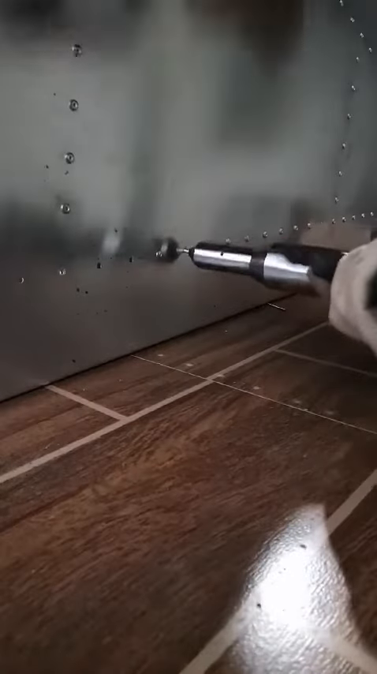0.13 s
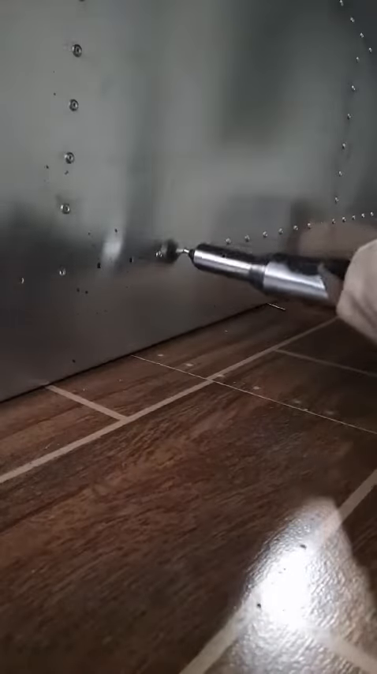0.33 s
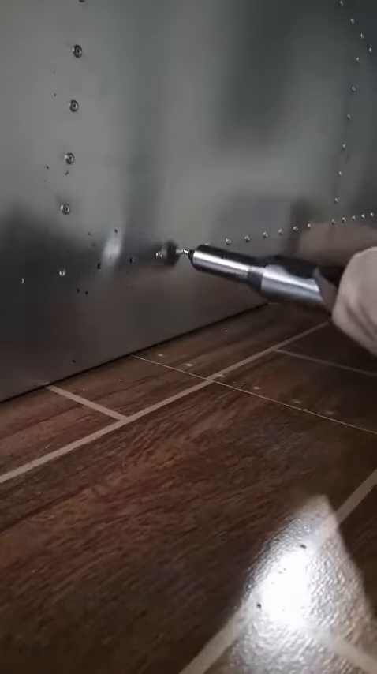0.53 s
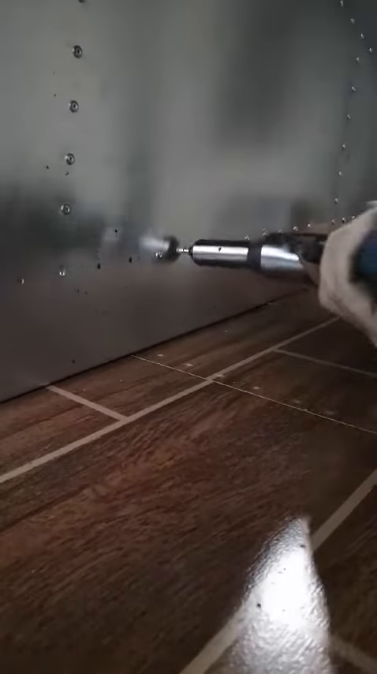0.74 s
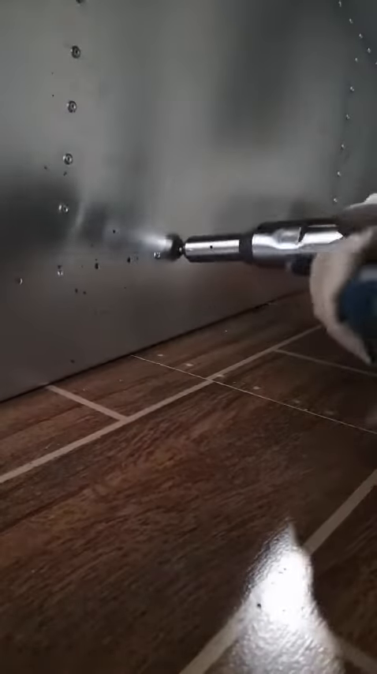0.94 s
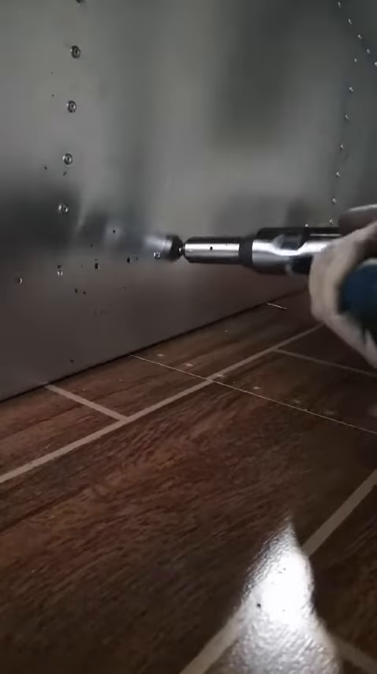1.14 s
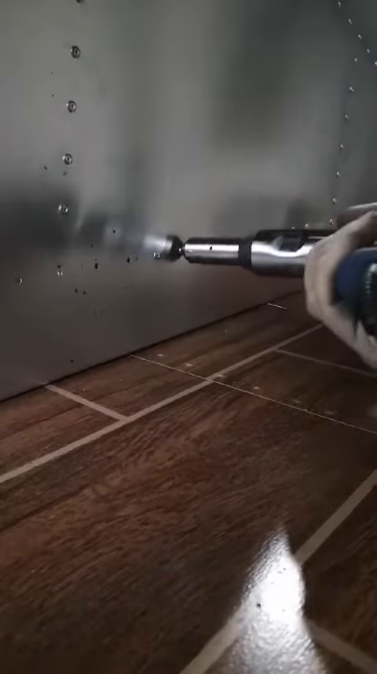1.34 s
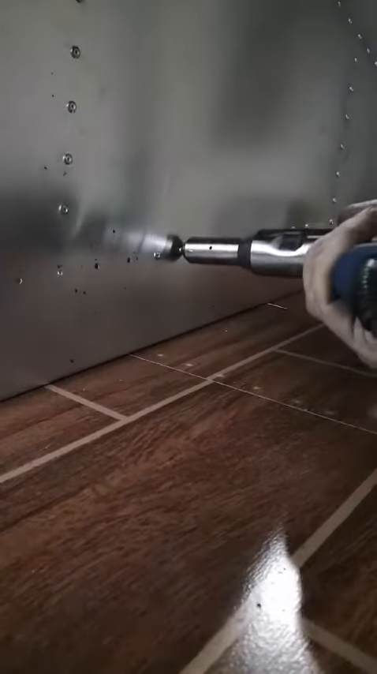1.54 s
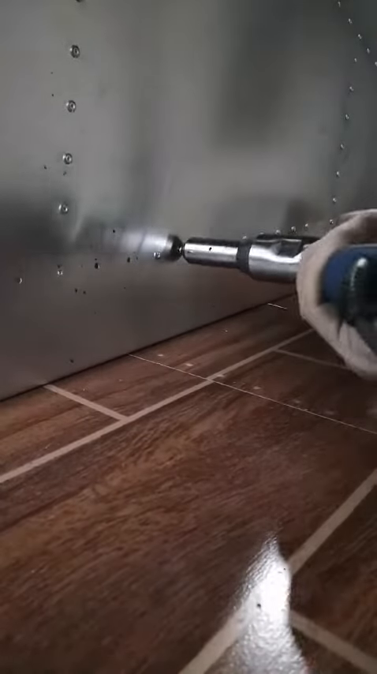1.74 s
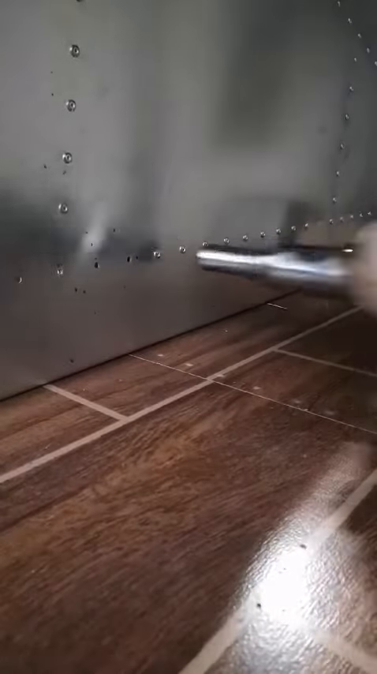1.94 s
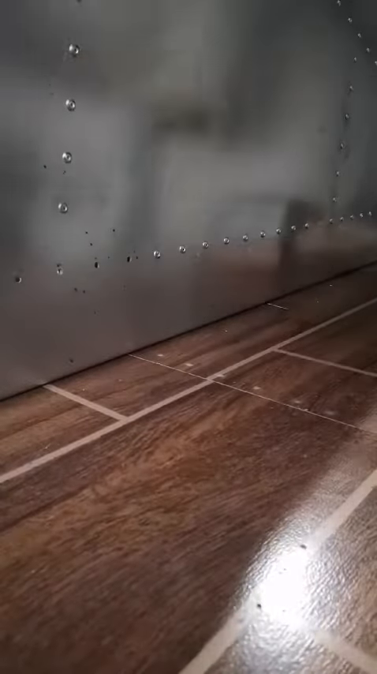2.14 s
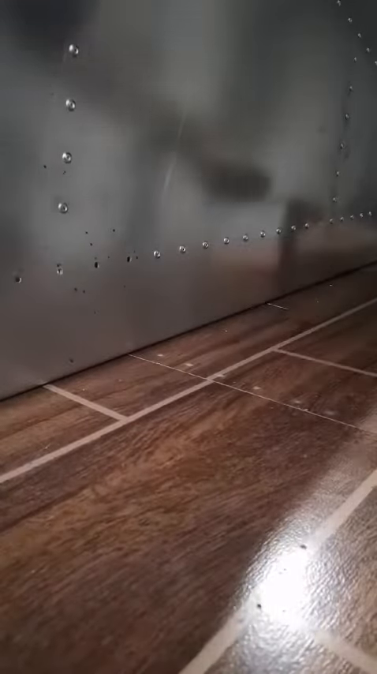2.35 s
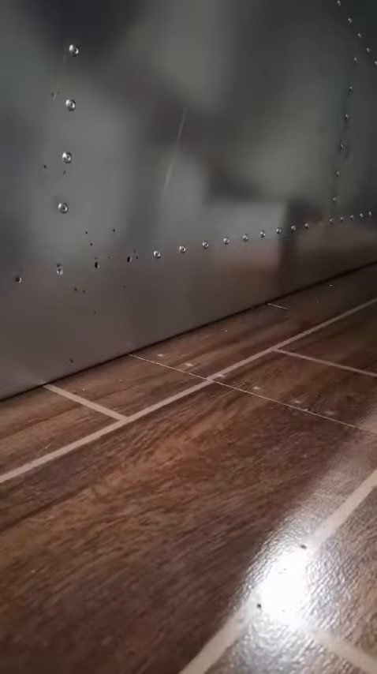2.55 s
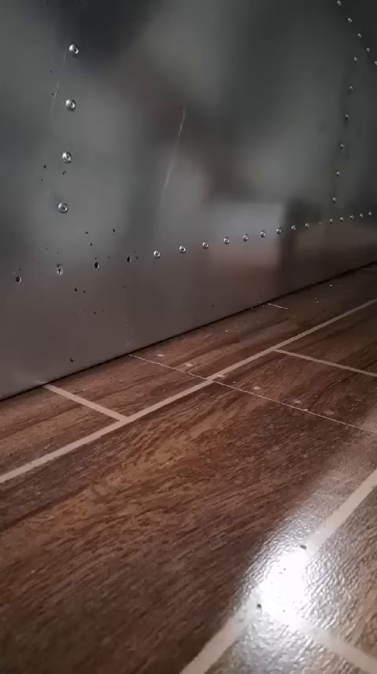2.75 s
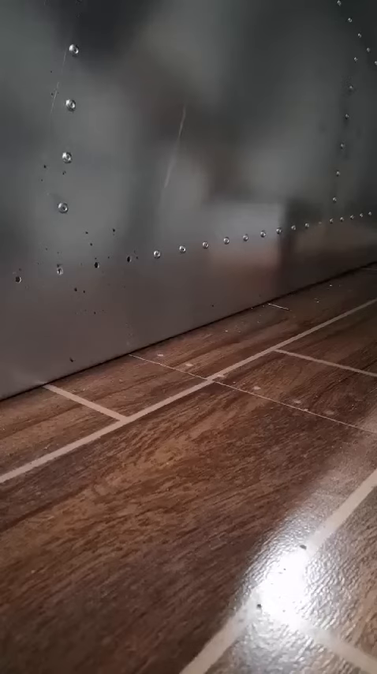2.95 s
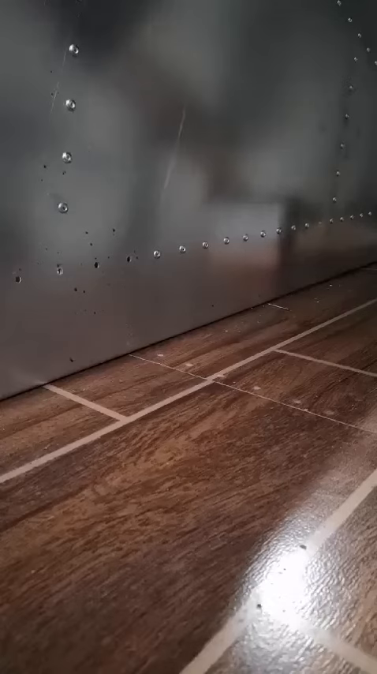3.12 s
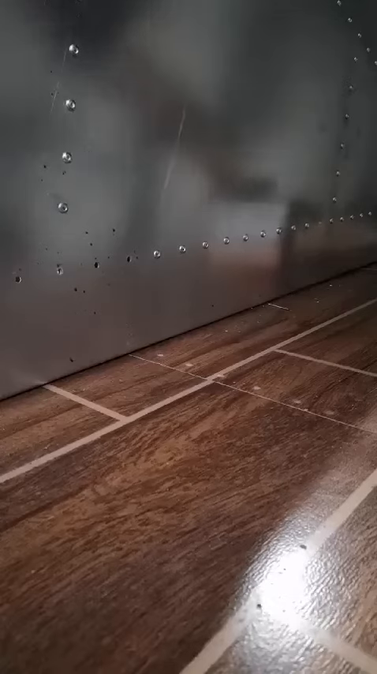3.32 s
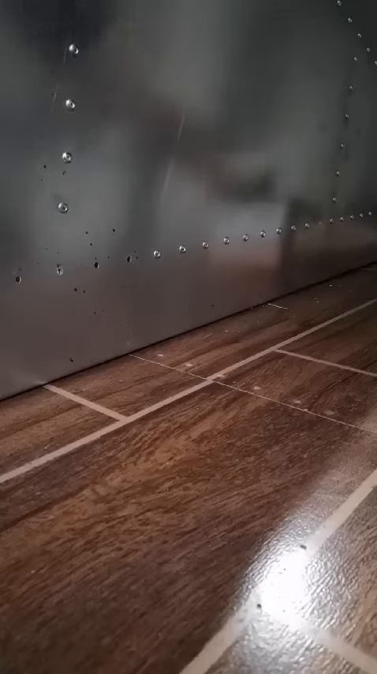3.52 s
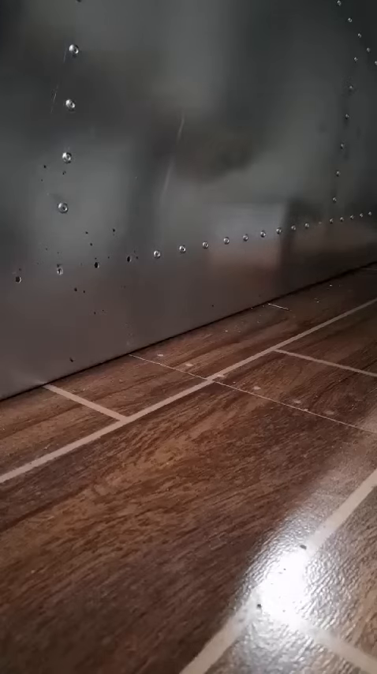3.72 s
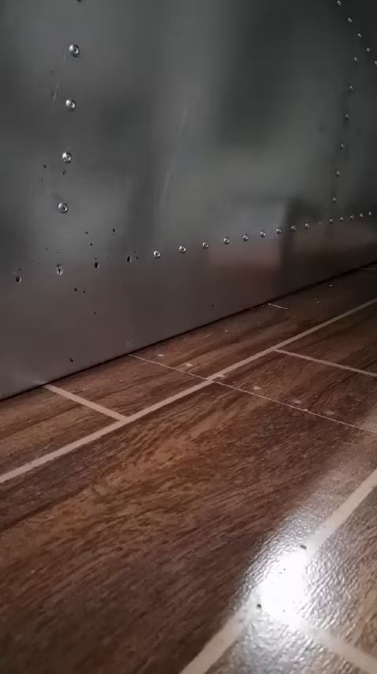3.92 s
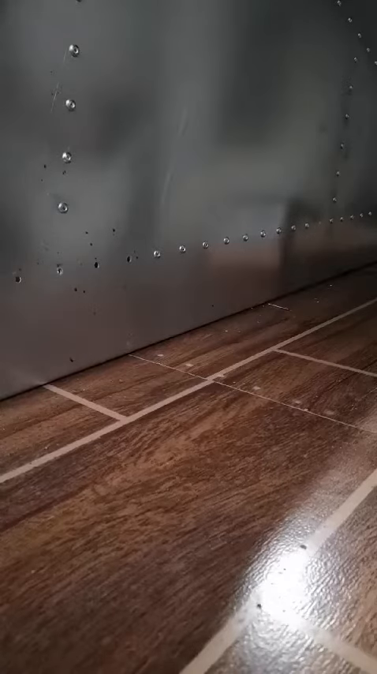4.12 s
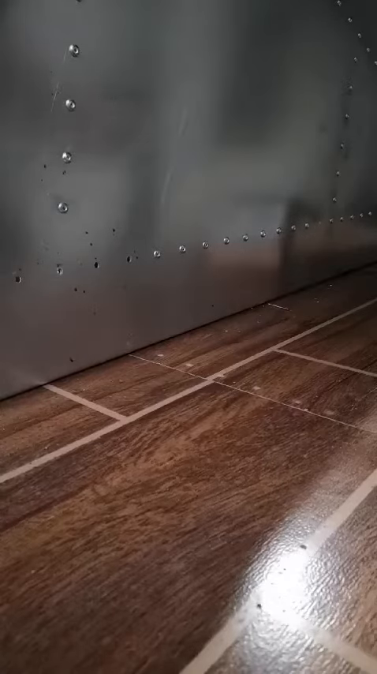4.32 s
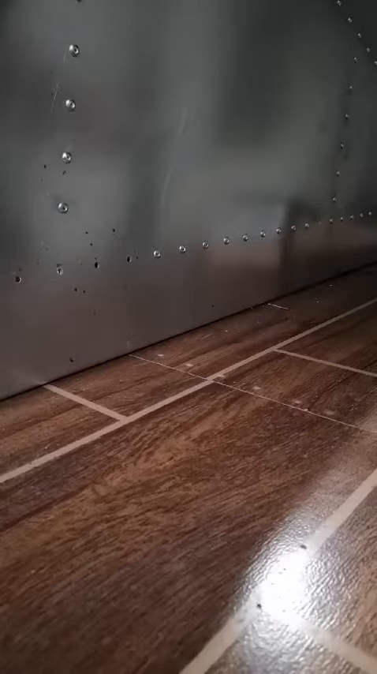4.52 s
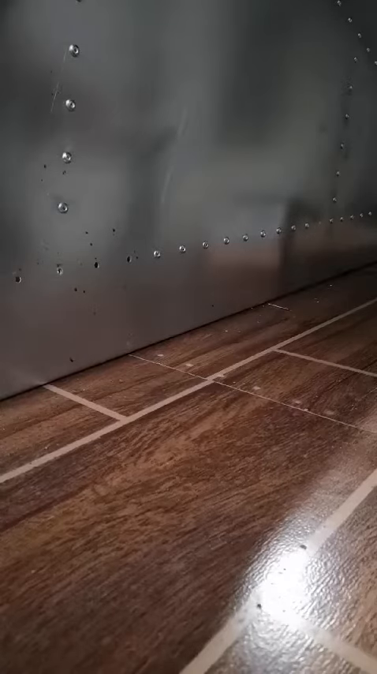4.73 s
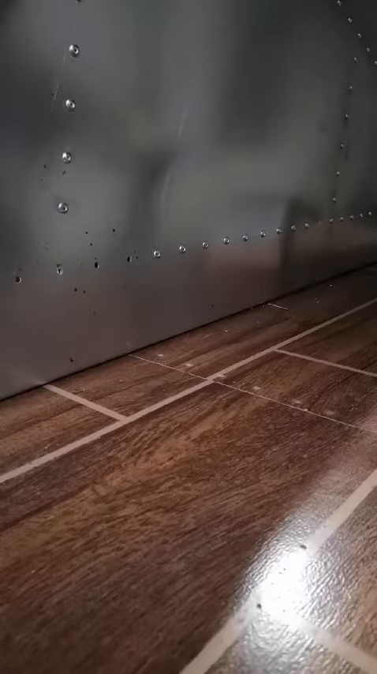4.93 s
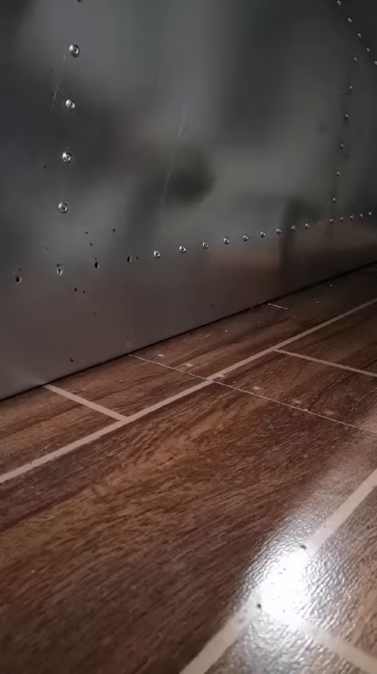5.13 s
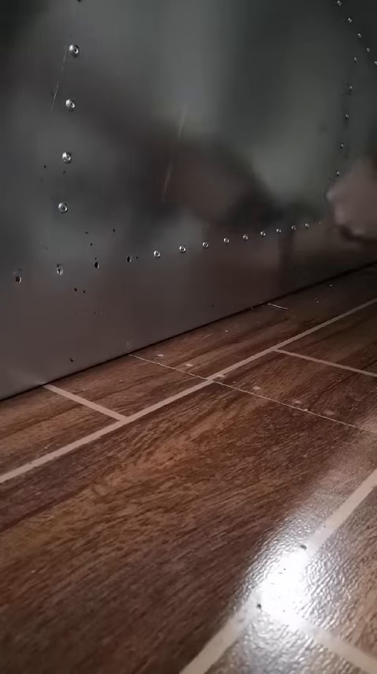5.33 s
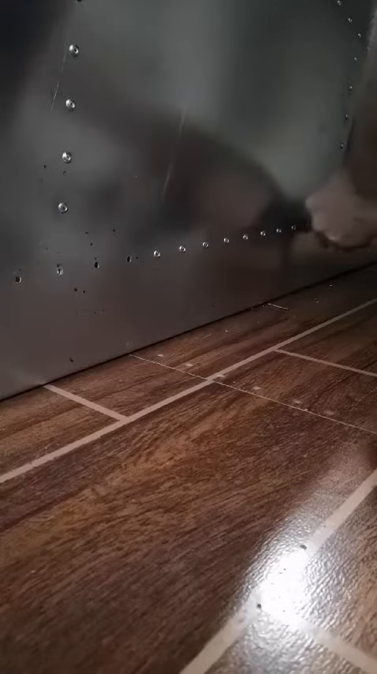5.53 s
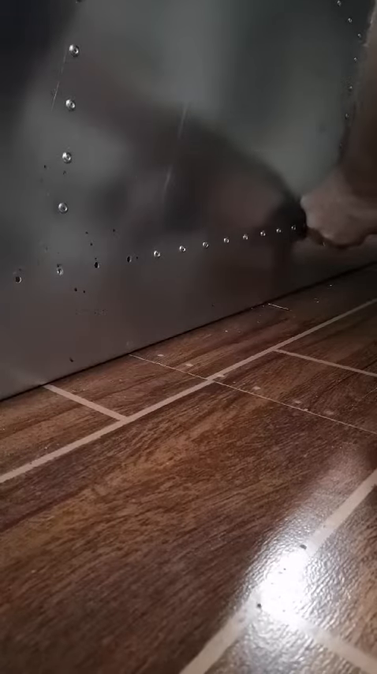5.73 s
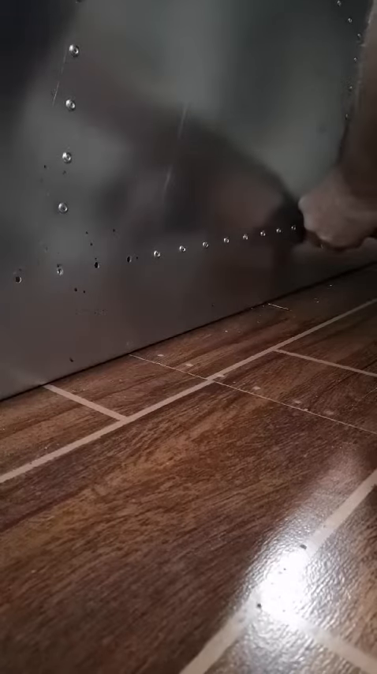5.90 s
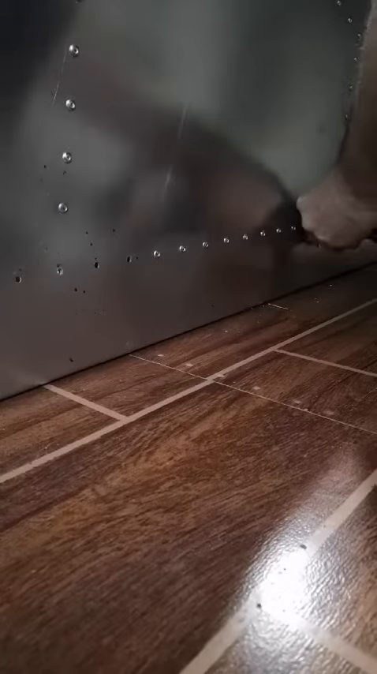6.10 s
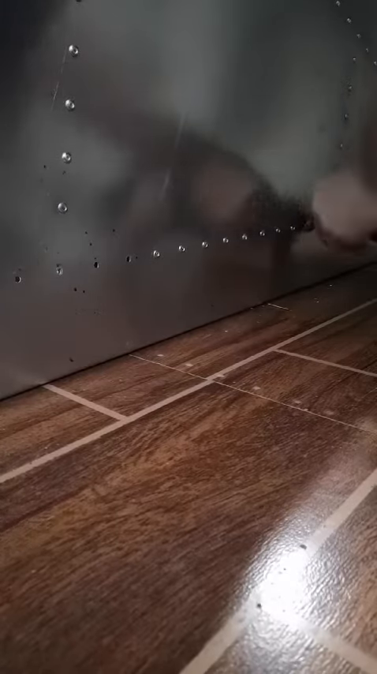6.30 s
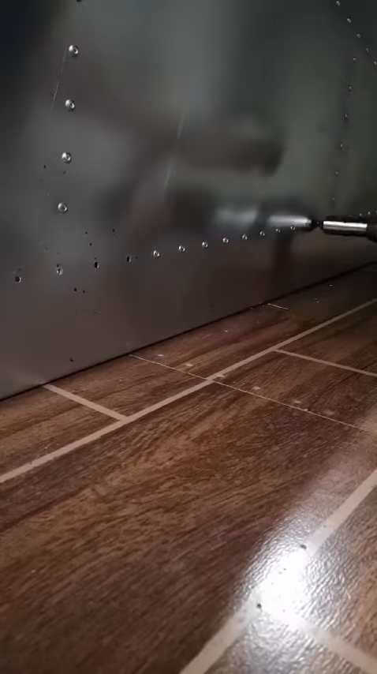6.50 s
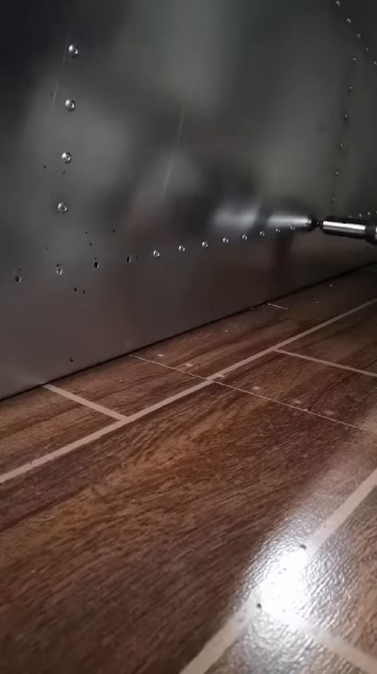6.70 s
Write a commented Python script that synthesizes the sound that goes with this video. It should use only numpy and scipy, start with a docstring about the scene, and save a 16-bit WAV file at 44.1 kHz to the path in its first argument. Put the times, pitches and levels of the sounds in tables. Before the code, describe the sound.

An air drill whines and hisses nonstop against a metal wall, with dull thumps, a brief squealing bite and sharp metallic snaps.

```python
"""An air drill runs without a stop beside a riveted metal wall, drilling out rivets.
Its vane motor whines; its exhaust roars, hisses and sets the muffler ringing. The bit bites with a squeal,
the motor sags, and the bit comes free with a sharp snap. The drill is drawn back, then set on the next
rivet. The sheet booms dully whenever it is bumped, over the faint hum of the room.
The hardest snaps make a limiter duck the whole sound for a moment."""
import sys
import numpy as np
from scipy import signal
from scipy.fft import rfft, irfft, next_fast_len
from scipy.io import wavfile
from scipy.ndimage import uniform_filter1d, minimum_filter1d, map_coordinates

SR = 44100
rng = np.random.default_rng(int(sys.argv[2]) if len(sys.argv) > 2 else 0)


def wrap_up_sound(samples):
    """Save the sound to the file named by the first command line argument, as 16-bit audio."""
    columns = np.atleast_2d(samples).T
    # keep every value between -1 and 1, then stretch to whole-number steps
    tamed = np.clip(columns, -1, 1)
    steps = np.round(tamed * 32767).astype(np.int16)
    wavfile.write(sys.argv[1], SR, steps)


N = 302526
TIME = np.arange(N) / SR

FREE_HZ = 492.5  # rotor speed with no load
BITE_S, STALL_S = 1.56, 1.805  # the bit digs in, and stops digging
SPLIT_HZ = 3000  # the roar lies below this, the hiss above

# The fader ride of the jet's hiss; the free gears follow it too. Each row: time in seconds, level in dB.
JET_LEVEL = [(0, -21.5), (1.2, -20.5), (1.75, -22.5), (1.83, -23), (2.25, -22), (2.7, -31), (3.3, -27.5),
             (3.9, -28.5), (4.9, -26), (6.86, -22.5)]


def motor(angle):
    """The vane rotor's clean whine, with thin gear and bearing lines that sing only near full speed."""
    # The whine as the drill is turned and moved. Each row: time in seconds, left and right level in dB.
    whine_levels = [(0, -37, -30), (0.25, -34, -25), (0.45, -38, -35.5), (0.77, -34, -31),
                    (0.8, -25, -19.5), (0.95, -36, -23.5), (1.4, -31, -21.5), (1.68, -42, -31),
                    (1.76, -50, -39), (1.95, -36.5, -35), (2.25, -38, -37.5), (2.45, -57, -37),
                    (2.6, -71, -41), (2.82, -64, -51), (3.03, -47, -44), (3.27, -57, -43.5),
                    (3.8, -39, -36), (4.6, -44, -36.5), (5.1, -38.5, -36.5), (5.8, -33.5, -25),
                    (6.86, -39, -25.5)]
    # Vanes, gears and bearings running free. Each row: multiple of the rotor speed, relative level in dB.
    free_orders = [(2, -27.5), (2.4, -27), (3, -20), (4, -19), (5, -23.5), (12, -23.5), (13.23, -27),
                   (15.65, -26), (18.08, -24), (20.92, -25.5), (21.63, -30), (29.02, -37)]
    ear_phase = np.array([[-1.9], [0]])  # radians
    tone = amp(.45 * wobble(20)) * np.sin(angle + ear_phase + .035 * wobble(30))
    sway_db = 1.1 * np.array([wobble(7), wobble(7)])  # the hand is never quite still
    whine = np.sqrt(2) * amp(curves(whine_levels) + sway_db) * tone
    gears = (1 - sag() / FREE_HZ) ** 16 * partials(angle, free_orders, flicker_db=3.5, smear=0.6)
    return whine + amp(curves(JET_LEVEL)[0]) * gears * amp([[5], [-4]])


def sag(slowing_hz_per_s=205, recover_s=.78):
    """Rotor speed lost to the bite, in Hz: the loss grows steadily, then the rotor spins up again."""
    lost_hz = slowing_hz_per_s * (np.clip(TIME, BITE_S, STALL_S) - BITE_S)
    return lost_hz * np.exp(-np.maximum(TIME - STALL_S, 0) / recover_s)


def exhaust():
    """Roar, hiss and muffler together; the level dips briefly as the bit lands."""
    dip_db = -6 * stroke(0.931, 1.03, attack_s=.005, release_s=0.091)
    return amp(dip_db) * (gap(roar() + hiss()) + muffler())


def roar():
    """Exhaust air sounds between drill, wall and floor, following the drill's place and speed."""
    # The roar's colour at the first rivet, drawn back, and at the second rivet.
    # Each row: frequency in Hz, left and right level in dB.
    first = [(660, -12.5, -19.5), (860, -4.5, -4.5), (935, -4, -1), (1140, -2.5, -5.5), (1310, -9, -8.5),
             (1510, -2, -3.5), (1717, 0, -4), (1980, -6, -2.5), (2130, -4.5, -10), (2460, 2.5, 0.5),
             (2620, 3, 3), (2870, -1.5, -2), (3160, -17, -19.5)]
    back = [(620, -10.5, -12), (744, -2, -1.5), (980, -2, -0.5), (1110, -12, -11.5), (1250, -16, -8),
            (1460, -17, -10.5), (1640, -15, -3), (1890, -23, 0), (2200, -8, 0), (2440, -0.5, 1),
            (2730, 5.5, -4), (2920, -2, -1), (3130, -13, -22)]
    second = [(700, -6.5, -8), (860, -19, -18), (997, -13.5, -12.5), (1163, 2.5, 0), (1300, -4.5, -10.5),
              (1450, -1, -3.5), (1510, -7.5, -19), (1655, -1, -7), (1950, -1, -4), (2020, -8, -10),
              (2430, -3, -15), (2570, -11.5, -18), (2790, -3, -8), (3170, -10.5, -6)]
    # Its stereo image. Each row: frequency in Hz, coherence from 0 to 1, right phase lead in radians.
    image = EXHAUST_IMAGE
    air = at_place(*[amp(db) * rush(colour, image, low_hz=705, high_hz=SPLIT_HZ)
                     for colour, db in [(first, -16), (back, -25), (second, -20.5)]])
    sputter = unit(amp(0.4 * wobble(7) + 0.7 * wobble(35) + 0.5 * wobble(160)))
    flow = amp(-0.12 * sag())  # a slower rotor passes less air
    return flow * sputter * air


def hiss():
    """The air jet's treble, with bright lobes that sweep by as the nozzle turns."""
    # The jet's colour at the first rivet, drawn back, and at the second rivet.
    # Each row: frequency in Hz, left and right level in dB.
    first = [(3100, -14, -20), (3530, 1, -3), (3920, -5, -14), (4250, 0.5, -4), (4700, -1.5, -11),
             (4970, -2, -10), (5420, 2, -6), (5720, -1, -10), (6340, 0, -15), (7000, -3, -19),
             (7890, 4, -7.5), (8080, -5.5, -18), (9050, 1, -8), (9970, -3.5, -15), (11200, -11, -30),
             (12380, -16, -34), (15000, -23, -35)]
    back = [(3140, -4, -32), (3600, 1, -9), (4100, -1.5, -14), (4900, -1, -7.5), (5370, -0.5, -12),
            (5660, 0.5, -15), (5970, -4.5, -6.5), (6760, -1, -14), (7650, 0.5, -10), (8200, -4, -18),
            (9480, 0, -8), (9840, -4, -23), (10470, -9.5, -26), (12700, -16, -28), (15300, -27, -36)]
    second = [(3120, -14, 0), (3430, -3, -29), (3840, -3, 1), (4100, 3, -8), (4500, 0, -17), (4700, 4, -15),
              (5200, 3.5, -6), (5400, 0, -11), (5500, -1.5, -13), (5800, 5, -8), (6100, -1, -15),
              (6740, -4.5, -21), (7350, -10, -4), (8200, -1, -26), (8850, -2.5, -28), (9400, -5.5, -32),
              (10500, -11, -31), (12600, -14, -36), (15000, -30, -42)]
    # One band swells as the nozzle swings past.
    # Each row: start and end in seconds, first and last centre in Hz, width in Hz, lift in dB.
    sweeps = [(0.25, 0.38, 4900, 5400, 1300, 4), (0.698, 0.836, 4400, 4400, 700, 5.5),
              (0.723, 0.99, 8000, 9100, 600, 2), (1.11, 1.227, 5200, 5200, 900, 4.5),
              (1.199, 1.62, 9500, 9400, 650, 3.5), (1.82, 2.1, 3500, 3650, 380, 7),
              (1.94, 2.2, 8700, 7400, 1400, 5.5), (4.095, 4.85, 9600, 10600, 654, 7.5),
              (4.7, 5.2, 10700, 12100, 700, 3), (4.65, 5.25, 5200, 7700, 1500, 3),
              (5.154, 5.702, 7140, 11800, 1200, 6.5), (5.448, 6.86, 8900, 8650, 550, 9)]
    air = at_place(*[rush(colour, EXHAUST_IMAGE, low_hz=SPLIT_HZ) for colour in (first, back, second)])
    hz, t, spectrum = signal.stft(air, SR, nperseg=512)
    lobes_db = 0
    for start, end, from_hz, to_hz, width_hz, lift_db in sweeps:
        progress = np.clip((t - start) / (end - start), 0, 1)
        offset_hz = hz[:, None] - from_hz - progress * (to_hz - from_hz)
        lobes_db += lift_db * np.sin(np.pi * progress) * np.exp(-(offset_hz / width_hz) ** 2)
    eddies = uniform_filter1d(rng.standard_normal(spectrum.shape[1:]), size=24, axis=0)
    eddies_db = 1.25 * unit(uniform_filter1d(eddies, size=2, axis=1))
    jet = signal.istft(spectrum * amp(lobes_db + eddies_db), SR, nperseg=512)[1][:, :N]
    flutter = amp(.6 * wobble(35) + .9 * wobble(300))
    return amp(curves(JET_LEVEL)[0]) * unit(jet * flutter)


def muffler(puffs_per_s=1200, width_hz=100):
    """Irregular, sputtering puffs of air set the muffler's cavity ringing; its pitch drifts a little."""
    # The cavity's ring. Each row: time in seconds, level on the right in dB, resonance in Hz.
    ringing = [(0, -24.5, 1730), (0.6, -23, 1780), (1.4, -33, 1670), (1.9, -25.5, 1780),
               (2.25, -20.5, 1790), (2.7, -34, 1820), (2.8, -27, 1810), (3.15, -28, 1766),
               (3.55, -25.5, 1800), (3.77, -32.5, 1800), (3.95, -26, 1780), (4.2, -32.5, 1840),
               (5.05, -30.5, 1810), (5.25, -43, 1760), (5.42, -23, 1740), (5.7, -18.5, 1820),
               (5.95, -20, 1821), (6.86, -18.5, 1825)]
    level_db, hz = curves(ringing)
    puffs = (rng.random(N) < puffs_per_s / SR) * rng.standard_normal(N)
    stray = (rng.random((2, N)) < puffs_per_s / SR) * rng.standard_normal((2, N))  # each ear's own
    carrier = np.exp(2j * np.pi * np.cumsum(hz) / SR)  # shifts a one-pole filter up to the resonance
    pole = np.exp(-np.pi * width_hz / SR)
    ring = (carrier * signal.lfilter([1], [1, -pole], (puffs + .7 * stray) / carrier)).real
    ring = unit(filtered(ring, lambda f: band(f, 1590, 2100)))
    sputter = unit(amp(wobble(60)))
    return amp(level_db) * sputter * ring * amp([[-11], [0]])


def gap(air):
    """The gap between drill and wall colours the exhaust; shifting reflections hollow its treble."""
    # The gap rings higher as it narrows. Each row: time in seconds, resonance in Hz, lift in dB.
    resonance = [(0.1, 2690, -10), (0.57, 2660, -6), (0.9, 2573, -7), (4, 2633, -7.5), (4.4, 2560, -4.5),
                 (5.1, 2640, -6.5), (5.3, 3050, 6.5), (5.7, 3690, 3.5), (6.86, 3950, 1)]
    hz, t, spectrum = signal.stft(air, SR, nperseg=512)
    times, gap_hz, lift_db = np.transpose(resonance)
    ratio = hz[:, None] / np.interp(t, times, gap_hz)
    # A peak with a notch just above it; a negative lift swaps the two.
    shape = np.exp(-((ratio - 1) / 0.11) ** 2) - np.exp(-((ratio - 1.2) / 0.078) ** 2)
    ripple = uniform_filter1d(rng.standard_normal(spectrum.shape), size=3, axis=1)
    slow_ripple = unit(uniform_filter1d(ripple, size=55, axis=2))
    hollows_db = 2.7 * slow_ripple * band(hz, 1900, 16000, order=2)[:, None]
    colour_db = np.interp(t, times, lift_db) * shape + hollows_db
    return signal.istft(spectrum * amp(colour_db), SR, nperseg=512)[1][:, :N]


def cut(angle):
    """The bit bites: loaded gears squeal, the tip grinds and the flutes scrape the rivet."""
    # Gears and bit under load.
    # Each row: multiple of the rotor speed, relative left and right level in dB, growth over the bite in dB.
    load_orders = [(4.4, -14, -12, 6), (5.87, 1, -10, -8), (7, -4, -11, 14), (7.33, -10, -16, -5),
                   (9.2, -10, -18, 5), (11, -13, -22, 8), (12.1, -12, -20, 8), (14, -7, -20, 5),
                   (21, -15, -26, 0)]
    # The flutes rub the rivet. Each row: start and end in seconds, level in dB.
    scrapes = [(1.524, 1.758, -28.5), (1.943, 2.109, -22)]
    # The colours of grinding and scraping. Each row: frequency in Hz, level in dB.
    grind_colour = [(2500, 1), (4200, 9), (6000, 4), (9000, 4.5), (11500, -37)]
    scrape_colour = [(1800, -27), (2600, 7.5), (3100, 7.5), (3650, 1), (4300, -15), (6500, -7),
                     (10000, -35)]
    bite = stroke(BITE_S, STALL_S, attack_s=0.01, release_s=0.003)
    depth = curves([(BITE_S, -.5), (STALL_S, .5)])[0]
    rub = sum(amp(db) * stroke(start, end, attack_s=0.01, release_s=0.2) for start, end, db in scrapes)
    judder = .07 * wobble(300)  # the uneven bite shakes the rotor
    lines = sum(amp(growth_db * depth) * partials(angle + judder, [order], flicker_db=1.2, smear=.4)
                for *order, growth_db in load_orders)
    squeal = amp(-19 + 1.3 * wobble(150)) * lines
    rasp = unit(amp(3 * wobble(450)))
    grind = amp(-21.5) * rasp * rush(grind_colour, [(3000, 0.18)], low_hz=2400)
    scrape = rub * amp(1.7 * wobble(90)) * rush(scrape_colour, [(3000, 0.13)])
    return bite * squeal + (bite * grind + scrape) * amp([[1], [-8]])


def snaps(attack_s=0.00027, choke_s=0.00019):
    """The bit catches for an instant: its steel modes are driven hard, then choked."""
    # Short metal contacts. Each row: start in seconds, level in dB, length in seconds, mode cutoff in Hz.
    contacts = [(0.9435, -7.5, .003, 2500), (0.9478, -13.5, .007, 2600), (1.805, -13, .003, 9000),
                (2.01, -14, .005, 4000), (2.3213, 2.5, .0038, 9000)]
    # The bit's modes. Each row: frequency in Hz, relative level in dB.
    bit_modes = [(1150, -11), (1730, -2), (2080, -6), (2500, -4), (2780, -2), (3140, -9), (3820, -9),
                 (5600, -13), (6020, -10), (6250, -9), (7800, -18)]
    t = np.arange(SR // 10) / SR
    out = np.zeros(N + len(t))
    for start, db, length, top_hz in contacts:
        ring = sum(amp(mode_db) * band(hz, 0, top_hz) * np.sin(2 * np.pi * (hz * t + rng.random()))
                   for hz, mode_db in bit_modes)
        crack = .3 * uniform_filter1d(rng.standard_normal(len(t)), size=3)
        envelope = stroke(0, length, attack_s, choke_s, t)
        out[round(start * SR):][:len(t)] += amp(db) * envelope * unit(ring + crack)
    return out[:N] * amp([[0], [-.5]])


def sheet():
    """Each bump rings one main mode of the wall over a dense boom; the running tool makes it rumble."""
    # Bumps on the sheet. Each row: start in seconds, level in dB, ring time (t60) in seconds,
    # main mode in Hz, clank against the bump in dB.
    bumps = [(0.472, -16.5, 0.15, 189, -28), (0.944, -7, 0.073, 303, -10), (0.956, -10, 0.06, 300, -14),
             (0.968, -5.5, 0.11, 193, -18), (1.018, -13, 0.15, 168, -25), (1.044, -11.5, 0.11, 168, -25),
             (1.1, -15.5, 0.35, 163.7, -43), (1.207, -24, 0.16, 143, -28), (1.702, -32, 0.36, 209, -25),
             (1.803, -22.5, 0.44, 157, -6.5), (2.18, -33, 0.17, 103, -25), (2.369, -37, 0.1, 332, -6),
             (5.798, -37, 0.55, 123, -29), (6.125, -24.5, 0.35, 160.6, -14), (6.165, -15.5, 0.14, 466, -15),
             (6.199, -23, 0.3, 181, -18), (6.77, -24, 0.32, 202, -6)]
    # The sheet's boom. Each row: frequency in Hz, level in dB.
    boom_colour = [(40, -41), (85, -9), (120, -6.5), (167, -2), (210, -1), (270, -3.5), (320, -6.5),
                   (400, -7), (550, 4.5), (700, -36), (1500, -55)]
    image = [(200, 0.97), (330, 0.65), (500, 0.15)]

    def blows(life, rise_s):
        """The envelope of all bumps, summed in power, with ring times scaled by life."""
        return np.sqrt(sum((amp(db) * decay(s, t60 * life, rise_s)) ** 2 for s, db, t60, *_ in bumps))

    thuds = sum(amp(db) * decay(s, t60, rise_s=.005) * np.sin(2 * np.pi * hz * (TIME - s))
                for s, db, t60, hz, _ in bumps)
    # The higher modes die sooner.
    clank_level = sum(amp(db + clank_db) * decay(s, t60 * .48) for s, db, t60, _, clank_db in bumps)
    clank = clank_level * rush([(300, -7), (550, -7), (800, 13), (1500, -24)], image, low_hz=260)
    # The deepest flexing is slower to start and to die; hard bumps drive it out of proportion.
    flex_level = amp(-1.5) * blows(life=4.6, rise_s=0.095) ** 1.316
    flex = flex_level * rush([(25, -16), (60, -8.5), (100, -8.5), (150, -8)], [(100, 0.98)], high_hz=170)
    boom = amp(-3) * blows(life=0.92, rise_s=.0022) * rush(boom_colour, image, high_hz=360)
    rumble = shaking() * rush(boom_colour, image)
    return thuds + boom + rumble + clank + flex


def shaking(seated_s=5.46, settle_s=0.4):
    """How hard the running tool shakes the sheet: more when near, most when seated or leant on."""
    seated = 1 - np.exp(-np.maximum(TIME - seated_s, 0) / settle_s)
    leaning = amp(-36) * stroke(0.806, 1.4, attack_s=0.019, release_s=0.11)
    return at_place(first=amp(-39.5), back=amp(-60), second=amp(-32.5) * seated) + leaning


def room(hum_hz=56):
    """One light knock on the floor, a low hum that swells once, and faint rumble."""
    # The room's rumble. Each row: frequency in Hz, level in dB.
    rumble_colour = [(25, -17), (42, -2), (56, -24), (72, -7.5), (130, -7), (250, -11.5), (400, -8.5),
                     (650, -7.5), (2000, -29)]
    floor = rush([(300, -10), (420, -8), (540, 0)], [(500, 0.92)], low_hz=280, high_hz=577)
    knock = amp(-33) * decay(2.683, t60=.12) * floor
    hum_level = amp(-51.5) + amp(-32.5) * decay(2.37, t60=1.46, rise_s=0.083)
    hum = unit(amp(2.2 * wobble(18)) * np.sin(2 * np.pi * hum_hz * TIME + .6 * wobble(8)))
    return knock + hum_level * hum + amp(-45) * rush(rumble_colour, [(150, 0.99), (500, 0.045)])


def at_place(first, back, second):
    """Crossfade by where the drill is held: at the first rivet, drawn back, or at the second."""
    # How near the drill is to each rivet. Each row: time in seconds, share from 0 to 1.
    first_share = [(0, 1), (1.55, 0.9), (1.9, 1), (2.2, 0.28), (2.45, 0.13), (3, 0)]
    second_share = [(3.3, 0), (3.6, 0.066), (4, 0.024), (5.05, 0.063), (5.45, 0.62)]
    at_first, at_second = curves(first_share)[0], curves(second_share)[0]
    away = np.clip(1 - at_first - at_second, 0, 1)
    return np.sqrt(at_first) * first + np.sqrt(away) * back + np.sqrt(at_second) * second


def limiter(x, ceiling_db=1.5, look_ahead_s=0.0055, hold_s=0.046, release_db_per_s=32.5):
    """The gain drops just ahead of any peak over the ceiling, holds, then climbs back steadily."""
    over_db = np.maximum(20 * np.log10(np.abs(x).max(axis=0) + 1e-9) - ceiling_db, 0)
    ahead, hold = int(look_ahead_s * SR) + 1, int(hold_s * SR) + 1
    held_db = minimum_filter1d(-np.pad(over_db, (0, ahead))[ahead:], hold, origin=(hold - 1) // 2)
    climb_db = release_db_per_s * TIME
    gain_db = np.minimum.accumulate(held_db - climb_db) + climb_db
    return x * amp(uniform_filter1d(gain_db, ahead // 2 + 1))


def partials(angle, orders, flicker_db, smear):
    """Lines locked to the rotor; each drifts in strength and phase at each ear."""
    def line(order):
        flicker = amp(flicker_db * wobble(5))
        return flicker * np.sin(order * angle + 2 * np.pi * rng.random() + smear * wobble(45))
    return np.sqrt(2) * sum(amp(db)[:, None] * np.array([line(k), line(k)]) for k, *db in orders)


def rush(colour, image, low_hz=12, high_hz=16000):
    """Coloured stereo noise of rms 1. Each image row: Hz, coherence, optional right phase lead."""
    def ears(hz):
        coherence, *lead = along(image, hz)
        turn = np.arccos(np.clip(coherence, -1, 1)) / 2
        right = np.exp(1j * sum(lead))
        mix = np.array([[np.cos(turn), np.sin(turn)], [right * np.cos(turn), -right * np.sin(turn)]])
        return mix * (amp(along(colour, hz)) * band(hz, low_hz, high_hz))[:, None]
    return unit(filtered(rng.standard_normal((2, N)), ears).sum(axis=1))


def stroke(start, end, attack_s, release_s, t=TIME):
    """Envelope that rises at start, holds, and dies away after end."""
    return (1 - np.exp(-np.maximum(t - start, 0) / attack_s)) * np.exp(-np.maximum(t - end, 0) / release_s)


def decay(start, t60, rise_s=0.0015):
    """Envelope of a blow that falls 60 dB in t60 seconds."""
    age = np.maximum(TIME - start, 0)
    return (1 - np.exp(-age / rise_s)) * np.exp(-np.log(1000) * age / t60)


def wobble(rate):
    """A smooth random curve, rate knots a second."""
    return map_coordinates(rng.standard_normal(int(N * rate / SR) + 4), [TIME * rate])


def curves(rows):
    """One value per sample for each column after the time."""
    times, *columns = np.transpose(rows)
    return np.array([np.interp(TIME, times, c) for c in columns])


def along(rows, hz):
    """Each column after the frequency, read at hz on a log axis."""
    knots_hz, *columns = np.transpose(rows)
    return np.array([np.interp(np.log(hz + 1), np.log(knots_hz + 1), c) for c in columns])


def filtered(x, response):
    """Shape x by a frequency response."""
    size = next_fast_len(N + 8192)
    return irfft(rfft(x, size) * response(np.fft.rfftfreq(size, 1 / SR)), size)[..., :N]


def band(hz, low_hz, high_hz, order=8):
    """Gain of a band-pass."""
    return 1 / np.sqrt((1 + (low_hz / (hz + 1)) ** (2 * order)) * (1 + (hz / high_hz) ** (2 * order)))


def amp(db):
    """Decibels to gain."""
    return 10 ** (np.asarray(db) / 20)


def unit(x):
    """Scale to rms 1."""
    return x / np.sqrt(np.mean(x ** 2) + 1e-20)


def scene():
    """The drill, driven by one rotor and heard first on the left, over the wall and the room."""
    angle = 2 * np.pi * np.cumsum(FREE_HZ - sag() + 0.31 * wobble(9)) / SR
    left, right = exhaust() + motor(angle) + cut(angle) + snaps()
    lag_samples = 26
    return np.array([left, np.pad(right, (lag_samples, 0))[:N]]) + sheet() + room()


def record(dry):
    """A limiter ducks everything after the hardest snaps, and the very top of the treble is cut."""
    return filtered(limiter(dry), lambda hz: hz < 15300)


EXHAUST_IMAGE = [(625, 1, -0.67), (763, 0.94, 0.26), (983, 0.92, 0.19), (1135, 1, -0.68), (1290, 1, -0.67),
                 (1460, 1, -1.4), (1670, 1, -0.66), (1840, 0.98, 0.069), (1950, 0.93, -1.23),
                 (2210, 0.84, -0.99), (2440, 0.86, -0.0036), (2720, 0.4, 0.71), (3230, 0.42, 1.24),
                 (5400, 0.2, -0.08), (7500, 0.058, 0.43)]

dry = scene()
out = record(dry)
wrap_up_sound(out)
```